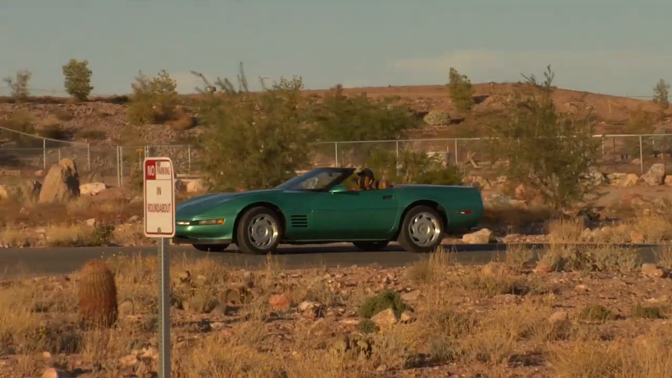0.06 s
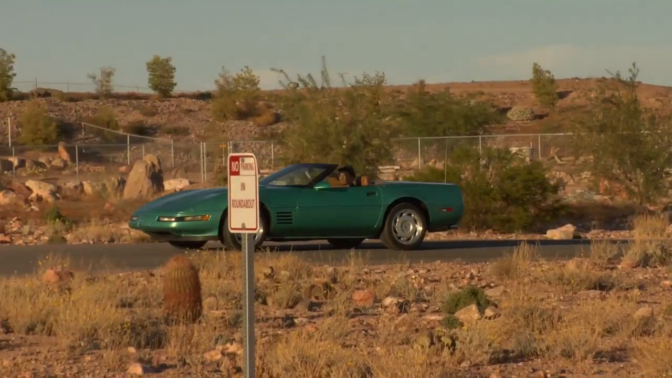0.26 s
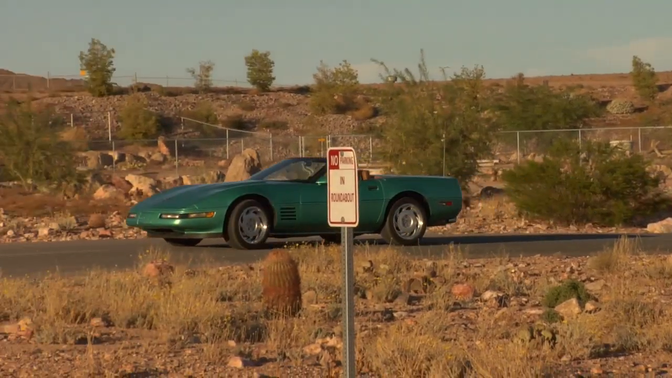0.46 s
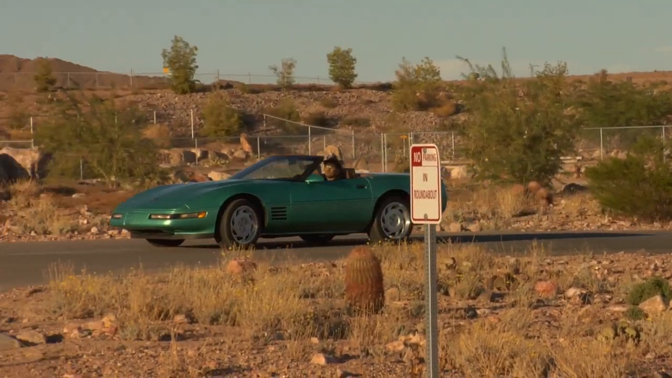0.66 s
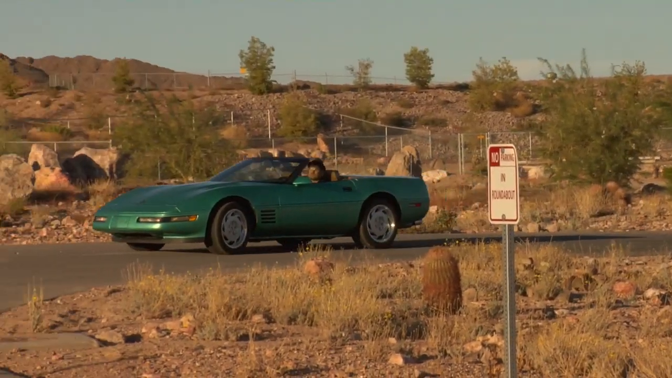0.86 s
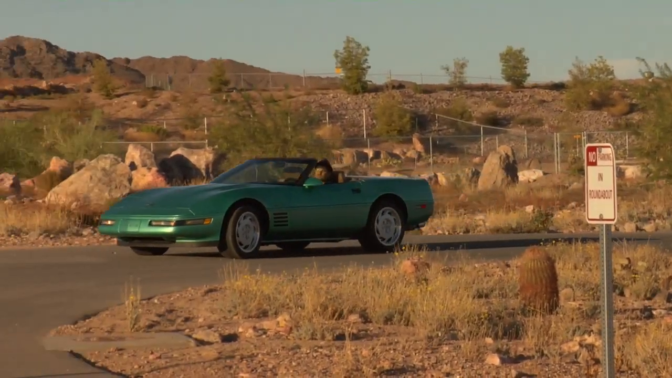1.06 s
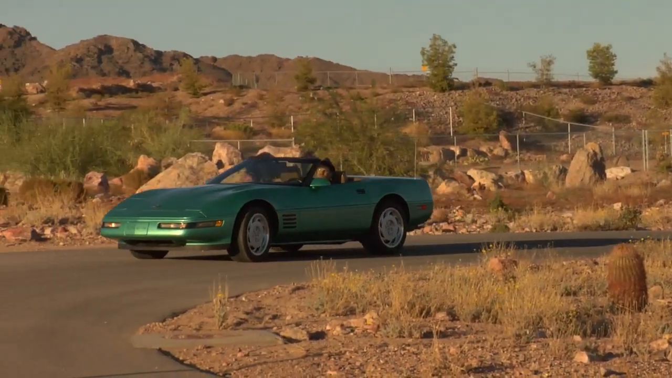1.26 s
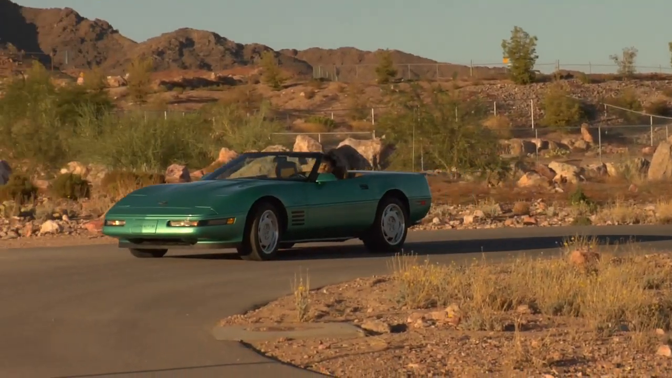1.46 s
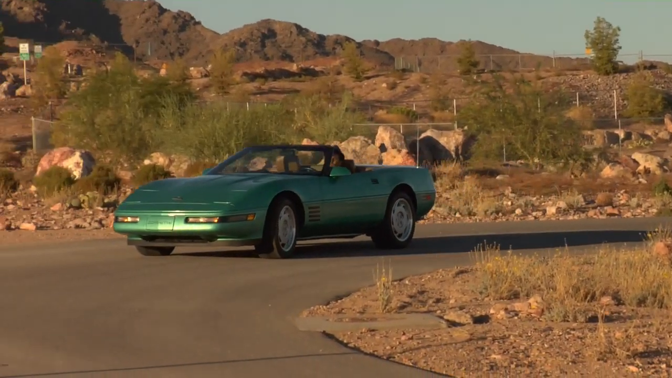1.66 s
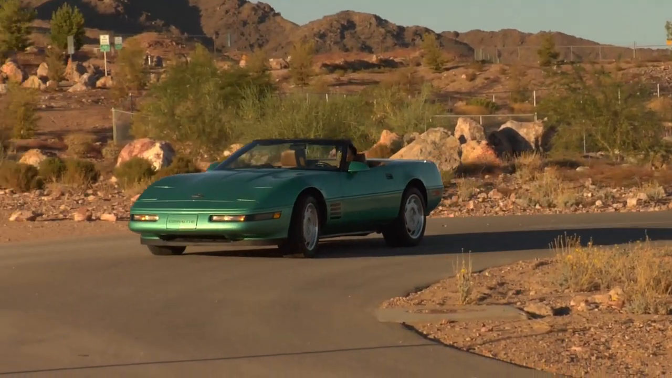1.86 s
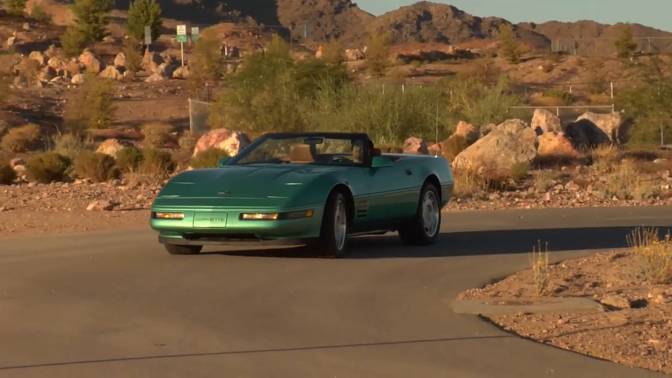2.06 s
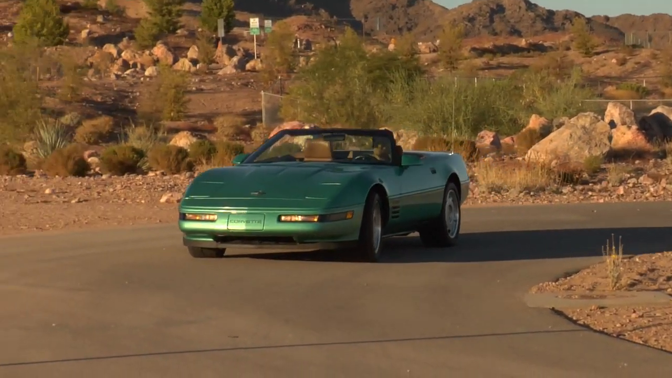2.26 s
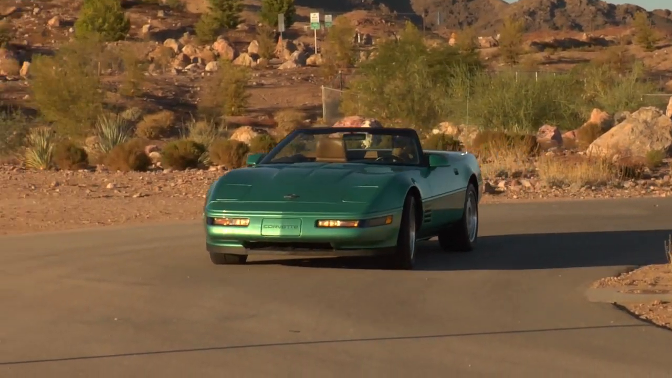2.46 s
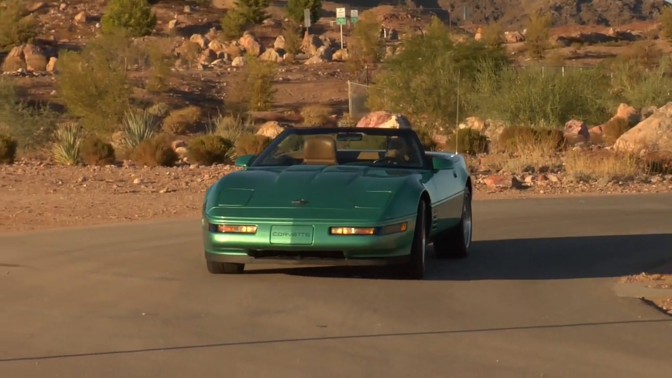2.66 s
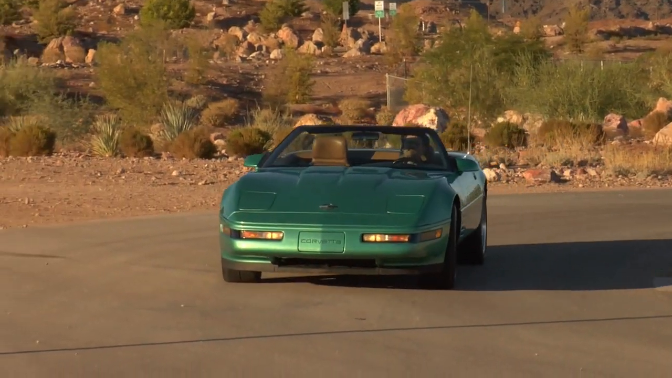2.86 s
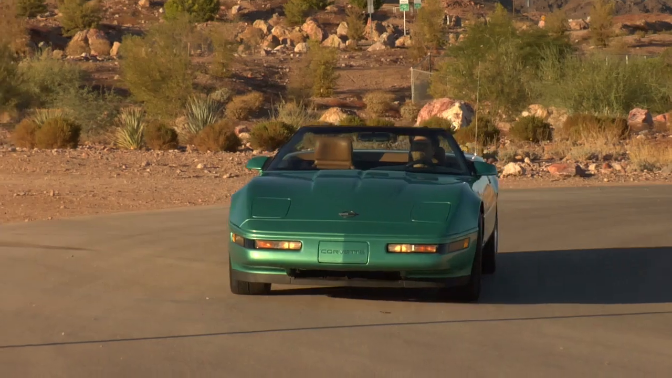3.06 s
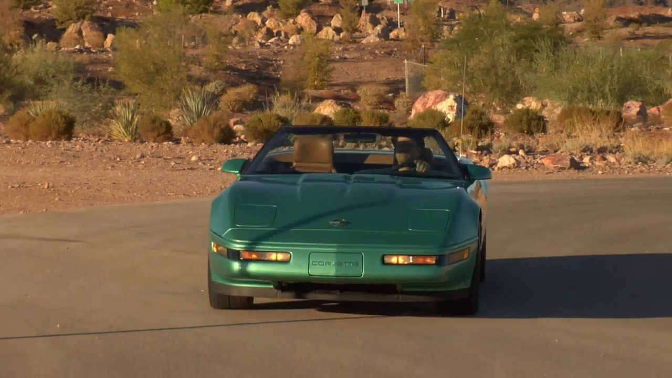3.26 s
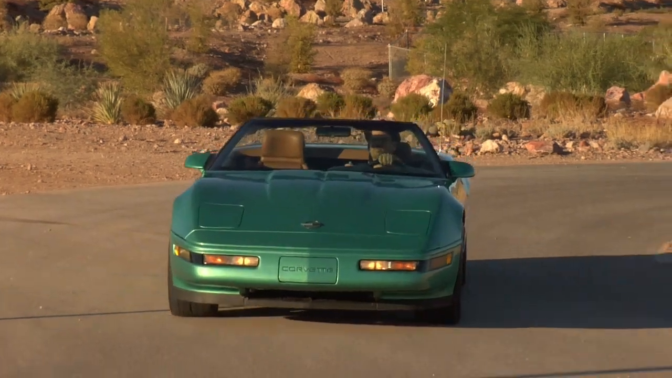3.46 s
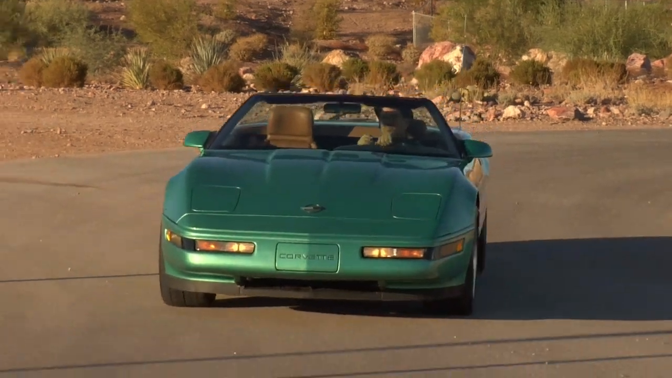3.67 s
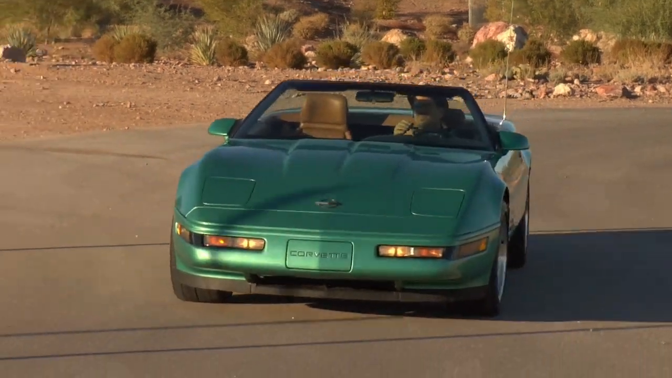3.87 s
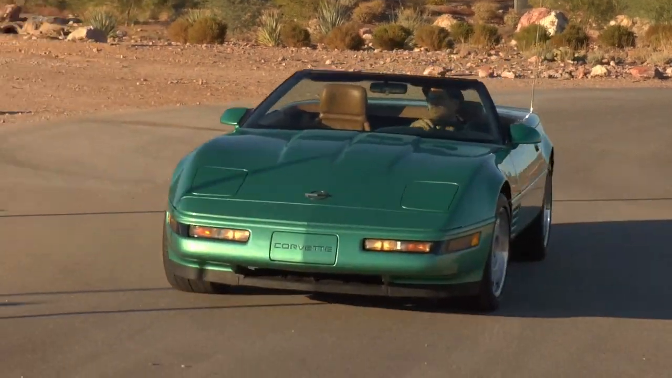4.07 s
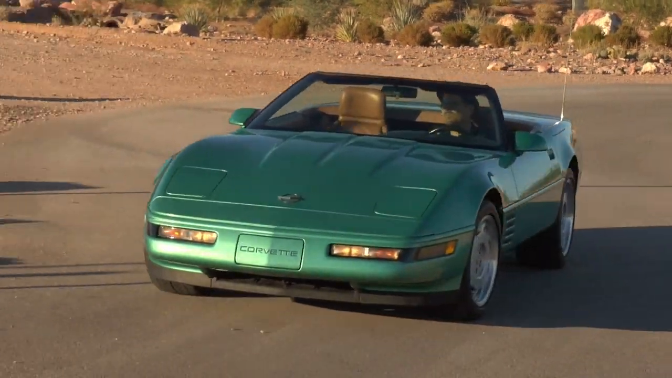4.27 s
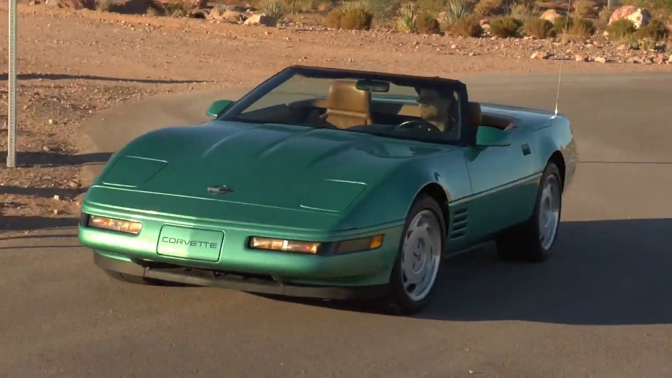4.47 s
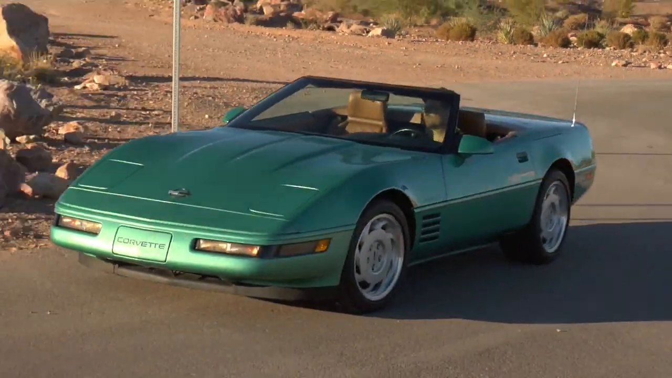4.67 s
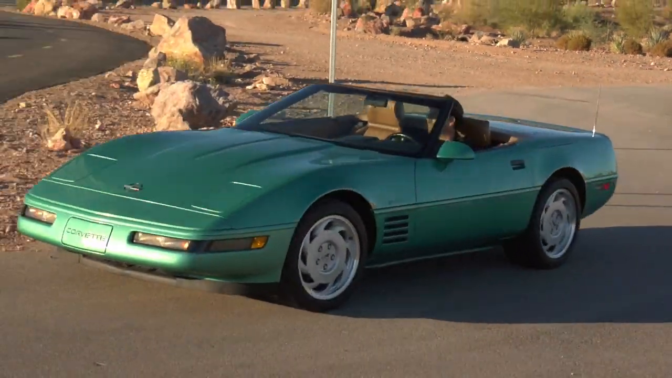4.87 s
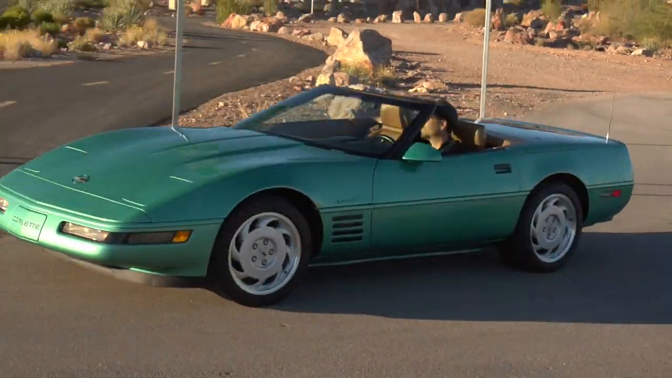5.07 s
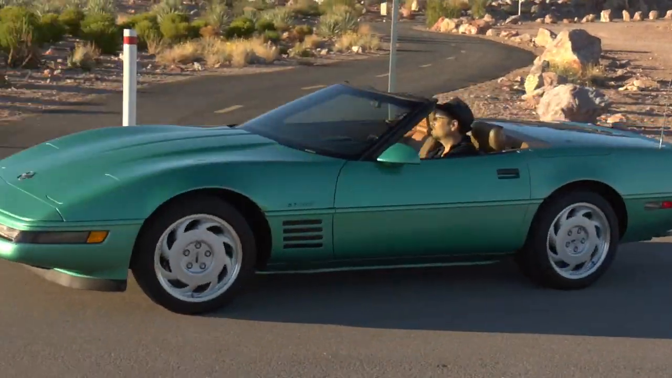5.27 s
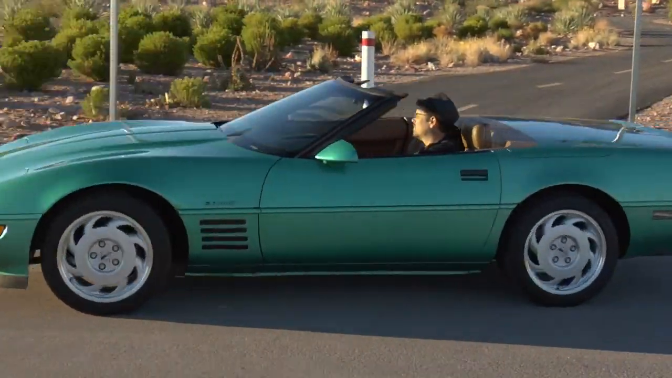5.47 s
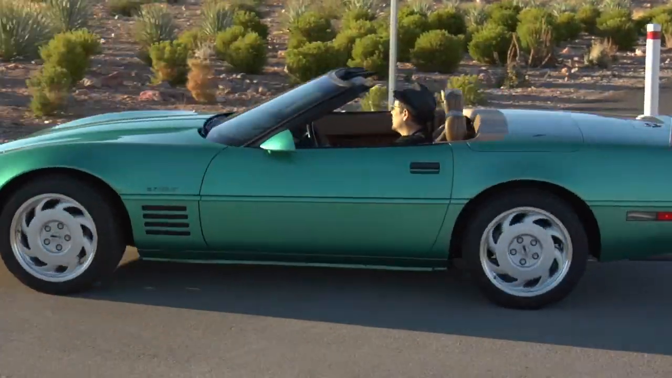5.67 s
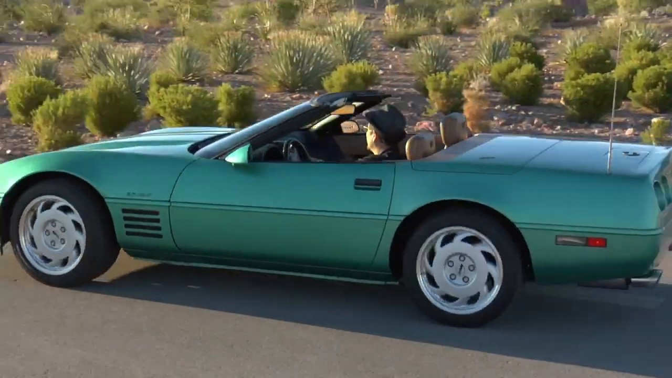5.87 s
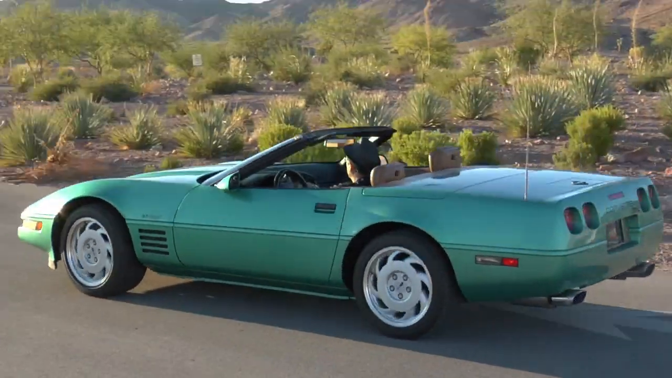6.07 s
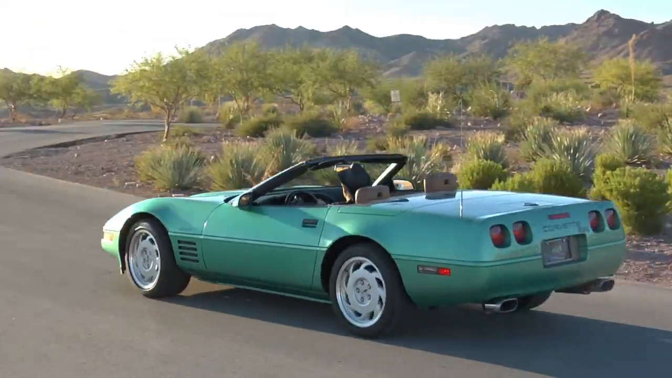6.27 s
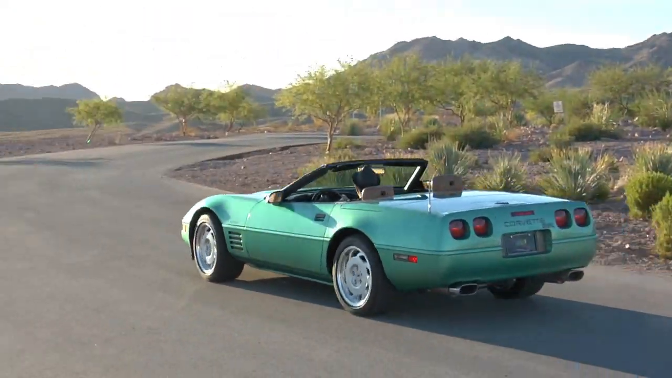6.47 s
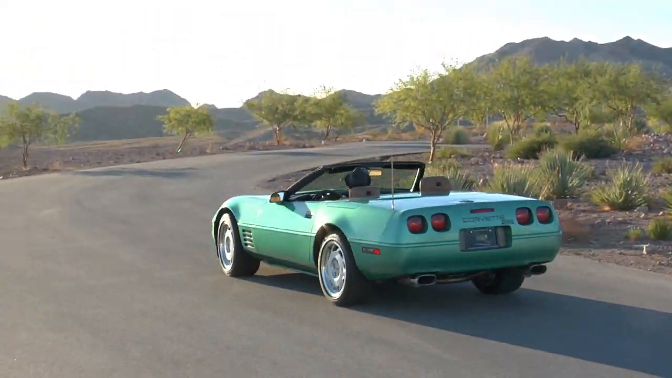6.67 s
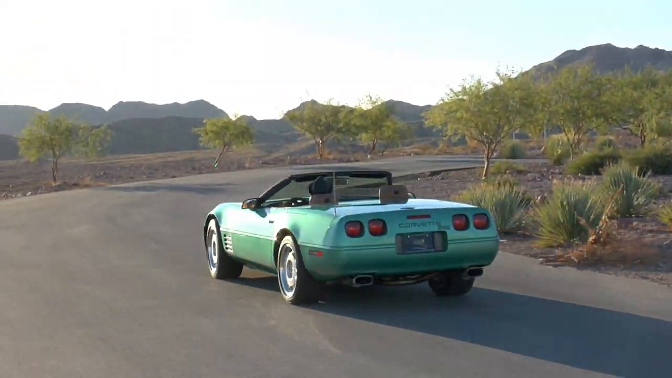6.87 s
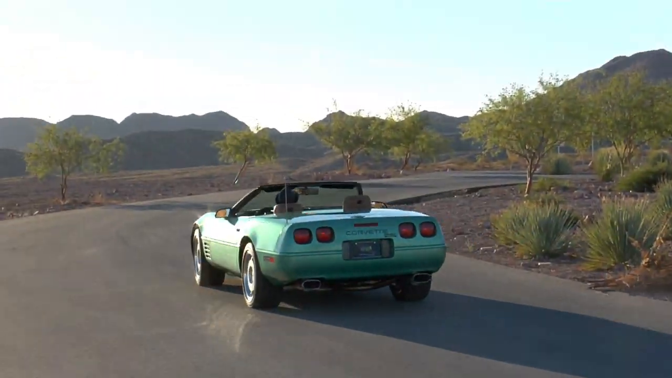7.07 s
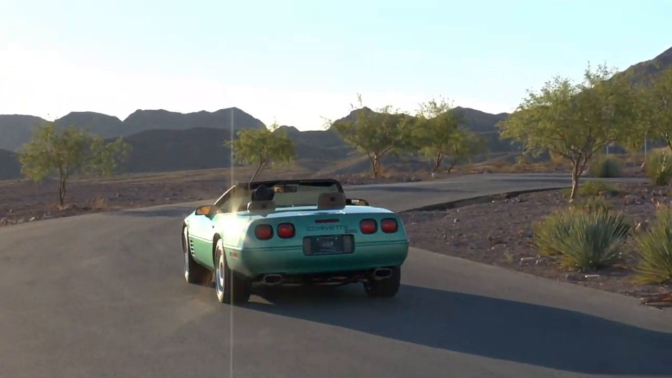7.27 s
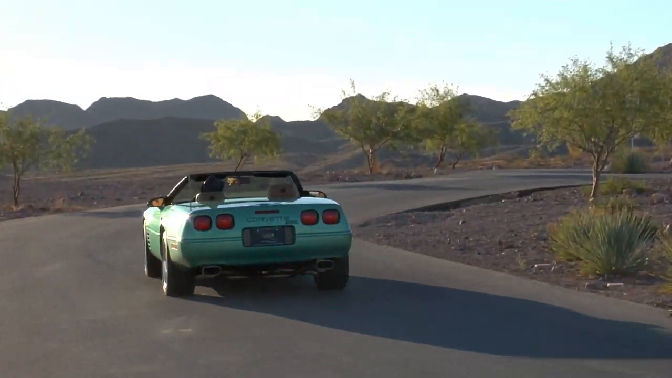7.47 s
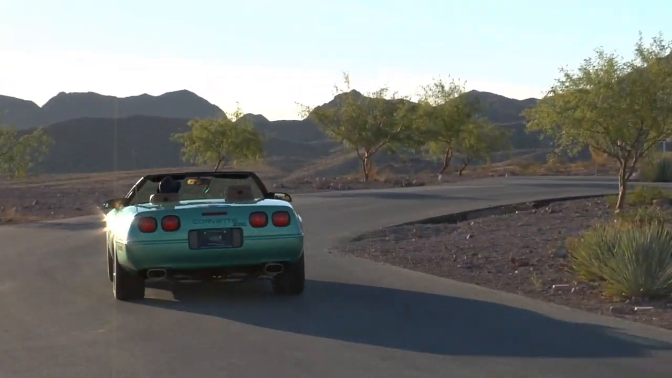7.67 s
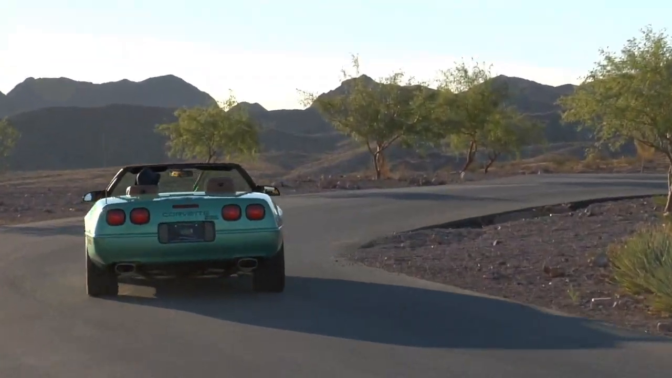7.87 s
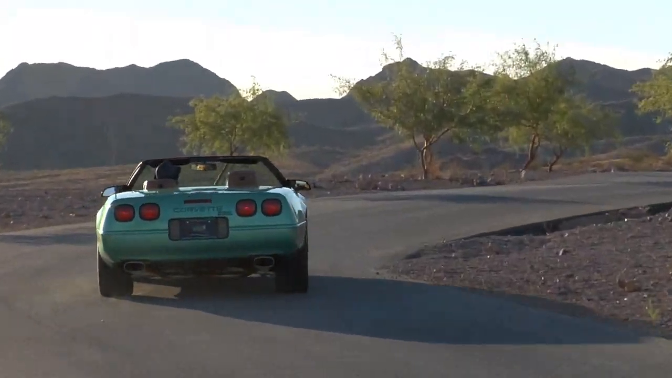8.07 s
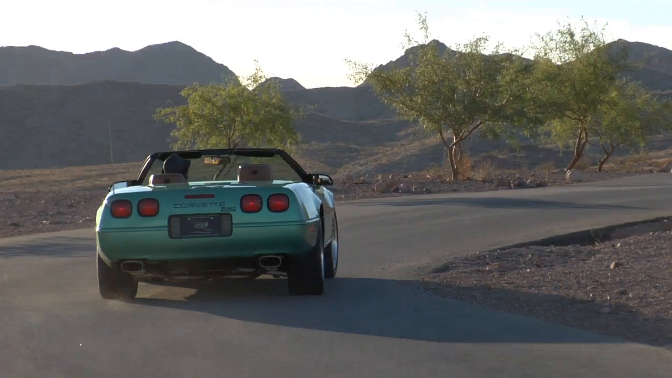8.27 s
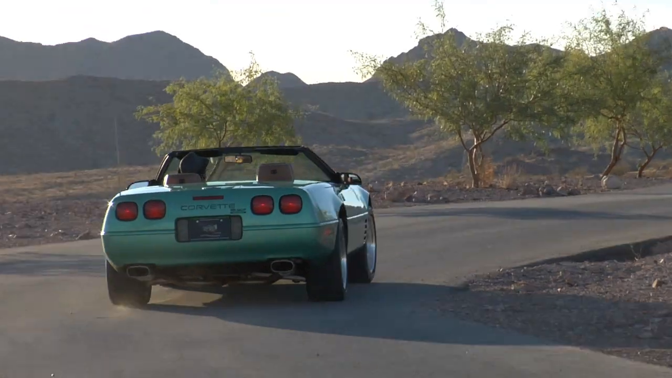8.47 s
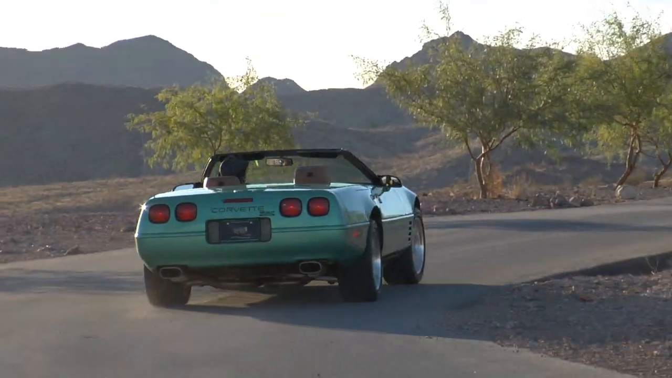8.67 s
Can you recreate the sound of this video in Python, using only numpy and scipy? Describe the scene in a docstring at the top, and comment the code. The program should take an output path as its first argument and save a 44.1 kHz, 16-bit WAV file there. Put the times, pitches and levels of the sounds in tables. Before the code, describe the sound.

A dry outdoor roadside, heard in mono from a fixed spot, with faint air hiss and a wavering low rumble that swells near 0.5 and 3.6 seconds. From the start a V8 car rolls up near idle, a muted, limping low burble partly screened until about 2 seconds. Tyre roar and gritty hiss grow clearer, with a wavering belt whine strongest around 3.5 seconds. Single stones snap between 3.6 and 5.2. From about 4.9 the throttle opens and the pitch rises quickly, nearly doubling by 5.5. The car passes closest at about 5.9, grit loud and broad; loose metal chinks cluster from 5.9 to 6.5. Afterwards the tailpipes face the listener: deep boom, throbbing drone and throaty rasp, strongest around 6.7. The tyres recede, one stone ticks at 7.2, the revs ease, a soft thud falls near 8.2, and the exhaust still drones at the end, around 8.7.

```python
"""Sports car driving past

A V8 sports car rolls up an open desert road near idle, opens the throttle as it passes, and drives off.
Steady tones make the tailpipe boom; noise pulsed by uneven firings rings as muffler burble and gas rasp.
Filtered noise and random grains make the gritty tyre sound, with single stones snapping.
A loose metal part chinks as ringing noise bursts, a belt whine comes from ahead, and a rumble lies beneath."""
import sys
import numpy as np
from scipy import signal
from scipy.fft import rfft, irfft, next_fast_len
from scipy.io import wavfile
from scipy.ndimage import uniform_filter1d, map_coordinates

SR = 44100
rng = np.random.default_rng(int(sys.argv[2]) if len(sys.argv) > 2 else 0)


def transcribe(u):
    """Save the signal u as a 16-bit wav file named by the first command-line argument.

    u: samples, shape (n,) or (channels, n), limited to [-1, 1]; the rate is SR.
    q: integer samples, one column per channel.
    """
    v = np.clip(np.atleast_2d(u).T, -1, 1)
    q = np.round(v * 32767).astype(np.int16)
    wavfile.write(sys.argv[1], SR, q)


N = 384111
TIME = np.arange(N) / SR
TOP_HZ = 15700

# spectrum of the low outdoor rumble: (frequency [Hz], relative level [dB])
RUMBLE = [(15, -20), (28, -11.5), (40, -1.5), (58, 3.5), (78, 9.5), (100, 13.5), (140, 3), (220, -13),
          (500, -45), (3000, -75)]
# times when the rumble swells: (middle [s], half-length [s], rise [dB])
RUMBLE_SWELLS = [(0.5, 0.64, 5.5), (3.604, 0.84, 7)]
# spectrum of the faint even hiss: (frequency [Hz], relative level [dB])
AIR = [(30, 21), (300, 10.5), (1000, 7), (3000, -1), (6000, 1.5), (10000, 1.5), (15500, 1)]

# spectrum of the tread roar: (frequency [Hz], relative level [dB])
TYRES = [(200, 1), (450, 1), (700, -1), (820, 2), (970, 5), (1100, 1.5), (1250, -3.5), (1800, -7),
         (2300, -18.5), (3000, -32), (4500, -45), (8000, -76.5)]
# spectrum of the crushed grit: (frequency [Hz], relative level [dB])
HISS = [(800, -14.5), (1600, 2.5), (2200, 3.5), (2800, -4), (3400, -10), (4300, -16.5), (5000, -17.5),
        (6500, -23), (8000, -29.5), (11000, -43), (15000, -46.5)]
# stones snapping under the tread: (time [s], peak level [dB], centre [Hz])
STONES = [(3.5835, -54, 3590), (3.625, -56, 3295), (4.248, -52, 2997), (4.536, -51, 2700),
          (4.677, -59, 4690), (4.843, -53, 3200), (5.22, -55, 4210), (7.211, -54, 3400)]
# jolts of a loose metal part: (time [s], level before a shared trim [dB])
CHINKS = [(5.9, -58), (6.042, -59), (6.074, -58), (6.191, -62), (6.275, -57), (6.288, -48.5), (6.312, -50),
          (6.361, -56), (6.393, -51.5), (6.418, -57), (6.474, -56), (6.553, -64), (6.705, -65),
          (6.837, -72.5), (6.941, -64.5), (7.185, -60)]
# resonances of that part: (frequency [Hz], width [Hz], relative level [dB])
CHINK_MODES = [(990, 190, 14.5), (2750, 500, 0.5), (4500, 780, -11), (4988, 160, -6.5), (5220, 95, -12)]

# engine speed, from idle to a light pull and easing off again: (time [s], firing rate [Hz])
REVS = [(0.0, 55.62), (0.7, 57.88), (1.45, 52.49), (2.32, 53.2), (2.71, 54.39), (3.13, 53.48),
        (4.48, 52.64), (4.82, 54.99), (4.99, 62.2), (5.23, 83.66), (5.45, 101), (5.72, 102.9),
        (6.18, 101.1), (6.52, 105.2), (7.22, 98.1), (7.51, 99.24), (8.33, 83.6), (8.7, 86.6)]
# how squarely the tailpipes face the listener: (time [s], share [0-1])
FACING = [(0, 0), (2.6, 0), (3.3, 0.08), (5.2, 0.03), (5.7, 0.36), (6.15, 0.6), (6.65, 1), (8.71, 1)]
# pulse strength of each cylinder in firing order: (strength [dB])
CYLINDERS = [-2, 0, 1, 5, 1, -2.5, 0, 4.5]
# muffler resonances: (frequency [Hz], width [Hz], ahead of the car [dB], beside it [dB], behind it [dB])
MUFFLER = [(149.4, 46, -6.5, -14, -17.5), (202.7, 58.5, -1, -3.5, -2.5), (248.4, 41.7, 3, -0.5, -6),
           (296.7, 46.5, -4.5, -0.5, -5.5)]
# spectrum of the gas rasp: (frequency [Hz], relative level [dB])
RASP = [(250, -32.5), (350, -8.5), (420, -2), (485, 0), (540, -3.5), (600, -0.5), (690, -12.5),
        (900, -13.5), (1400, -34), (3000, -63.5)]
# pipe-mouth resonances beamed to the rear: (frequency [Hz], width [Hz], relative level [dB])
BARK = [(518, 150, -6.5), (730, 550, -19.5)]
# brief surges of gas under throttle: (middle [s], half-length [s], burble change [dB], rasp change [dB])
SURGES = [(2.297, 0.72, 1.5, 0), (5.824, 0.076, 3, -2), (6.3, 0.092, 0.5, 0.5), (6.72, 0.36, 1, 8.5),
          (7.661, 0.2, 4.5, 4.5)]
# dip of the octave and burble once per engine cycle, before scaling by FACING:
# (firing rate [Hz], depth [0-1])
THROB = [(86, 0.25), (97, 0.85)]
# how the tailpipes pass each tone, booming near 100 Hz: (frequency [Hz], gain [dB])
PIPE = [(54, -8), (70, -4), (85, -3), (102, 0), (126, 1.5), (141, -8), (170, -16.5), (200, -30)]
# tones of the uneven firings, 8 being the firing tone:
# (multiple of the engine cycle rate, ahead of the car [dB], beside it [dB], behind it [dB])
LOPE = [(3, -38, -30, -32), (4, -27.5, -22, -32), (5, -15, 5, -10.5), (6, -18, -9, -18.5), (7, -8, -4, -21),
        (9, -19, -7, -13), (10, 2.5, 1, -1.5), (11, -10, -14.5, -11.5), (12, -13.5, -22.5, -16),
        (13, -20.5, -23, -16), (14, -14.5, -25, -7), (18, -16.5, -14, -19)]

# the drive past: speed, least distance, when the wheels are nearest, how far the tailpipes trail them
SPEED_M_S, KERB_M, PASS_S, TAIL_M = 5.7, 4.16, 5.945, 0.68
# a stony verge screens the car until it has rounded the bend
VERGE_S, CLEAR_S = 0.92, 2.03
# out of the bend it heads straight at the listener: (middle [s], half-length [s])
HEAD_ON = (3.57, 0.93)
# its body then hides the tailpipes until it draws level: (middle [s], half-length [s])
PIPES_HIDDEN = (4, 1.56)
# exhaust tones at the least distance: level at idle, and their growth with the revs
IDLE_HZ, IDLE_DB, EFFORT_DB_PER_OCTAVE = 55.3, -30, 15.5
# beaming of the octave and the lope: (ahead of the car [dB], beside it [dB], behind it [dB])
OCTAVE_BEAM_DB = (-2, -2, 15.5)
LOPE_BEAM_DB = (-9.5, -24, -7)
# sharpness of the once-per-cycle dip (share 0-1)
THROB_EDGE = 0.27


def undb(db):
    """Turn decibels into a gain."""
    return 10 ** (np.asarray(db) / 20)


def unit(x):
    """Scale to an average strength (rms) of 1."""
    return x / np.sqrt(np.mean(x ** 2))


def steady(x):
    """Scale to rms 1 over every half second, keeping the quick flutter."""
    return x / np.sqrt(uniform_filter1d(x ** 2, SR // 2) + 1e-18)


def curves(table):
    """Turn the columns of a table into smooth controls, one value a sample."""
    s, *columns = np.transpose(table)
    return [uniform_filter1d(np.interp(TIME, s, c), SR // 20, mode="nearest") for c in columns]


def noise():
    """White noise: equal strength at all frequencies."""
    return rng.standard_normal(N)


def colour(x, points):
    """Shape a sound by a spectrum of (frequency [Hz], level [dB]) points, then scale it to rms 1."""
    hz, db = np.transpose(points)
    size = next_fast_len(N + SR // 4)
    bin_hz = np.arange(size // 2 + 1) * SR / size
    gain = undb(np.interp(np.log(bin_hz + 1), np.log(hz), db))
    return unit(irfft(rfft(x, size) * gain, size)[:N])


def resonate(x, hz, width_hz):
    """Ring at one frequency: a resonance applied twice, for steep sides."""
    b, a = signal.iirpeak(hz, hz / width_hz, fs=SR)
    return signal.lfilter(b, a, signal.lfilter(b, a, x))


def walk(rate):
    """Slow random drift with a spread near 1, taking rate new values a second."""
    steps = rng.standard_normal(N // 100)
    return map_coordinates(steps, [TIME * rate], order=1, mode="wrap") * np.sqrt(3 / 2)


def bell(middle_s, half_s):
    """A smooth rise to 1 and fall again."""
    return np.exp(-((TIME - middle_s) / half_s) ** 2)


def add(track, s, sound):
    """Mix a short sound in at time s."""
    start = int(s * SR)
    track[start:start + len(sound)] += sound[:N - start]


def air(level_db=-73):
    """Still air: a faint even hiss of shaped noise."""
    return undb(level_db) * colour(noise(), AIR)


def rumble(level_db=-52.0, waver_db=3.3):
    """A low, wavering outdoor rumble that swells now and then."""
    swell_db = sum(db * bell(s, half_s) for s, half_s, db in RUMBLE_SWELLS)
    return colour(noise(), RUMBLE) * undb(level_db + swell_db + waver_db * walk(2))


def nearness(behind_m=0):
    """Least distance over present distance, for a point on the car: its gain as sound spreads out."""
    along_m = SPEED_M_S * (TIME - PASS_S) - behind_m
    return KERB_M / np.hypot(along_m, KERB_M)


def screened():
    """1 while the car is behind the verge, falling to 0 once it is in the open."""
    return np.clip((CLEAR_S - TIME) / (CLEAR_S - VERGE_S), 0, 1)


def aspect_db(facing, ahead_db, beside_db, behind_db):
    """Blend three levels as the car is heard from the front, the side and the rear."""
    return np.interp(facing, [0, .5, 1], [ahead_db, beside_db, behind_db])


def tread_roar(facing, level_db=-39.5, horn_db=5, rear_db=0.46, verge_db=-13, flicker_db=1.0):
    """Tread noise, beamed along the road by the wedge between tyre and asphalt."""
    end_on = (1 - nearness() ** 2) ** 2
    roar_db = level_db + horn_db * end_on + rear_db * facing + verge_db * screened()
    return colour(noise(), TYRES) * undb(roar_db + flicker_db * walk(14))


def grit_hiss(facing, level_db=-50.0, head_on_db=-6.5, rear_db=-3, verge_db=-2.0, flicker_db=1.0,
              grain_db=4.5, grit=0.52, grains_per_s=1500):
    """Crushed grit thrown out sideways: noise mixed with random grains of many sizes."""
    struck = rng.random(N) < grains_per_s / SR
    grain_size = undb(grain_db * np.minimum(rng.exponential(size=N), 6))
    grains = struck * np.sign(noise()) * grain_size
    hiss_db = level_db + head_on_db * bell(*HEAD_ON) + rear_db * facing + verge_db * screened()
    return colour(noise() + grit * unit(grains), HISS) * undb(hiss_db + flicker_db * walk(20))


def tyres(facing):
    """Tread roar and grit hiss, both growing as the wheels come near."""
    return nearness() * (tread_roar(facing) + grit_hiss(facing))


def stones(decay_s=.002, width_hz=2200):
    """Single stones crack out from under the tyres: short noise bursts ring at their own pitch."""
    out = np.zeros(N)
    t = TIME[:SR // 20]
    for s, db, hz in STONES:
        burst = rng.standard_normal(len(t)) * np.exp(-t / decay_s)
        snap = resonate(burst, hz, width_hz)
        add(out, s, undb(db) * snap / np.abs(snap).max())
    return out


def chinks(decay_s=0.019, trim_db=-10):
    """A loose metal part chatters briefly at each jolt and rings at its own frequencies."""
    out = np.zeros(N)
    t = TIME[:SR // 10]
    for s, db in CHINKS:
        chatter = rng.standard_normal(len(t)) * np.exp(-t / decay_s)
        ring = 0
        for hz, width_hz, mode_db in CHINK_MODES:
            ring = ring + undb(mode_db) * unit(resonate(chatter, hz, width_hz))
        add(out, s, undb(db + trim_db) * ring)
    return out


def thump(s=8.235, hz=140, width_hz=55, length_s=0.11, db=-39):
    """A soft low thud as the revs bottom out: a swell of noise rings at a low frequency."""
    out = np.zeros(N)
    swell = np.hanning(int(length_s * SR))
    puff = swell * rng.standard_normal(len(swell))
    puff = np.pad(puff, (0, SR // 20))  # room to ring on
    add(out, s, undb(db) * unit(resonate(puff, hz, width_hz)))
    return out


def whine(cycle, facing, level_db=-45.0, head_on_db=5.0, rear_db=-45, verge_db=-10,
          per_cycle=70.8, octave_db=-1, flutter_db=3, wander=.25):
    """Belt-driven parts: a wavering tone and its octave, geared to the engine and beamed forward."""
    angle = 2 * np.pi * (per_cycle * cycle + wander * walk(25))
    tone = undb(flutter_db * walk(8.1)) * np.sin(angle)
    octave = undb(octave_db + flutter_db * walk(14)) * np.sin(2 * angle)
    whine_db = level_db + head_on_db * bell(*HEAD_ON) + rear_db * facing + verge_db * screened()
    return nearness() * undb(whine_db) * (tone + octave)


def throb_depth(firing_hz, facing):
    """The throb is heard from behind, and smooths into a drone as the revs sink."""
    return facing * np.interp(firing_hz, *np.transpose(THROB))


def throb(cycle, depth):
    """Gain of the exhaust note: it holds, then dips briefly in the middle of each engine cycle."""
    angle = 2 * np.pi * cycle
    return 1 + depth * (np.cos(angle) - THROB_EDGE * np.cos(2 * angle))


def firings(cycle, scatter_db=2, jitter_s=0.00024):
    """One pulse per cylinder firing, each a little off in strength and time."""
    count = np.floor(cycle * len(CYLINDERS)).astype(int)
    at = np.flatnonzero(np.diff(count))
    chance = rng.standard_normal((len(at), 2))
    cylinder_db = np.array(CYLINDERS)[count[at] % len(CYLINDERS)]
    shift = (jitter_s * SR * chance[:, 1]).astype(int)
    pulses = np.zeros(N)
    pulses[np.clip(at + shift, 0, N - 1)] = undb(cylinder_db + scatter_db * chance[:, 0])
    return pulses


def turbulence(cycle, facing, size=4096):
    """Gas flow that partly repeats with every engine cycle, most of all straight out of the pipes."""
    repeat = .5 + .35 * facing
    pattern = rng.standard_normal(size)
    repeated = pattern[(cycle * size).astype(int) % size]
    return np.sqrt(repeat) * repeated + np.sqrt(1 - repeat) * noise()


def gas_levels(facing, burble_db=-26, burble_hidden_db=-7.0, burble_rear_db=-5.5, burble_verge_db=-2.0,
               rasp_db=-36.0, rasp_hidden_db=-3.0, rasp_rear_db=-4.5):
    """Levels (dB) of burble and rasp: even, but for the car's position and the surges of gas."""
    hidden = bell(*PIPES_HIDDEN)
    burble = burble_db + burble_hidden_db * hidden + burble_rear_db * facing + burble_verge_db * screened()
    rasp = rasp_db + rasp_hidden_db * hidden + rasp_rear_db * facing
    for s, half_s, more_burble_db, more_rasp_db in SURGES:
        surge = bell(s, half_s)
        burble = burble + more_burble_db * surge
        rasp = rasp + more_rasp_db * surge
    return burble, rasp


def muffler_burble(drive, facing):
    """The mufflers ring at their resonances, with polarity alternating from one to the next."""
    burble = 0
    for k, (hz, width_hz, *levels) in enumerate(MUFFLER):
        burble = burble + (-1) ** k * undb(aspect_db(facing, *levels)) * resonate(drive, hz, width_hz)
    return burble


def pipe_rasp(mouth, facing):
    """Gas rasps at the pipe mouths, which beam a throaty bark to the rear."""
    bark = sum(undb(db) * unit(resonate(mouth, hz, width_hz)) for hz, width_hz, db in BARK)
    return colour(mouth, RASP) + facing * bark


def exhaust(cycle, firing_hz, facing, puff_s=0.0069, flow=0.47, burble_pulse=0.19, burble_throb=0.29,
            lead_cycles=0.078, rasp_pulse=0.65, waver_db=1.5):
    """Pulses and the puffs of gas behind them ring the mufflers and rasp at the pipe ends."""
    burble_db, rasp_db = gas_levels(facing)
    pulses = unit(firings(cycle))
    puffs = unit(signal.lfilter([1], [1, -np.exp(-1 / (puff_s * SR))], pulses))
    # from the front the puffs blur into an even flow
    strength = facing * puffs + flow * (1 - facing ** 2)
    gas = unit(strength * turbulence(cycle, facing))
    dip = throb(cycle + lead_cycles, burble_throb * throb_depth(firing_hz, facing))
    burble = muffler_burble((gas + burble_pulse * pulses) * dip, facing)
    rasp = pipe_rasp(gas + rasp_pulse * facing * pulses, facing)
    # the burble wavers until the pipes face the listener
    waver = waver_db * (1 - facing) * walk(3)
    return steady(burble) * undb(burble_db + waver) + steady(rasp) * undb(rasp_db)


def tone_levels(firing_hz, facing, verge_db=-2, head_on_db=2.0, cancel_s=6.19, cancel_half_s=0.29,
                cancel_db=-9.0, third_db=-17, third_head_on_db=9):
    """Levels (dB) of the firing tone, octave, third harmonic and lope; all but the third follow the revs."""
    hz, db = np.transpose(PIPE)
    head_on = bell(*HEAD_ON)
    effort = IDLE_DB + EFFORT_DB_PER_OCTAVE * np.log2(firing_hz / IDLE_HZ)
    heard = effort + verge_db * screened() + head_on_db * head_on
    firing = heard + np.interp(firing_hz, hz, db)
    octave = heard + np.interp(2 * firing_hz, hz, db) + aspect_db(facing, *OCTAVE_BEAM_DB)
    lope = firing + aspect_db(facing, *LOPE_BEAM_DB)
    # the third harmonic only stands out from the front
    third = IDLE_DB + third_db + third_head_on_db * head_on
    # side-on, the firing tones of the two tailpipes partly cancel
    firing = firing + cancel_db * bell(cancel_s, cancel_half_s)
    return firing, octave, third, lope


def uneven_lope(angle, facing, waver_db):
    """The limping beat of two cylinder banks that fire unevenly: tones at multiples of the cycle rate."""
    lope = 0
    for multiple, *levels in LOPE:
        k = round(multiple)
        # every fourth multiple has the other polarity, so the beat limps in time as well as in strength
        polarity = 1 if k % 4 == 1 else -1
        gain = undb(aspect_db(facing, *levels) + waver_db * walk(11))
        lope = lope + polarity * gain * np.cos(k * angle)
    return lope


def boom(cycle, firing_hz, facing, waver_db=1.64):
    """The clean tailpipe tones: firing rate, octave and third harmonic, with the lope around them."""
    firing_db, octave_db, third_db, lope_db = tone_levels(firing_hz, facing)
    angle = 2 * np.pi * cycle
    firing = angle * len(CYLINDERS)
    tone = undb(firing_db) * np.cos(firing)
    octave = undb(octave_db) * np.sin(2 * firing) * throb(cycle, throb_depth(firing_hz, facing))
    third = undb(third_db + waver_db * walk(11)) * np.cos(3 * firing)
    lope = undb(lope_db) * uneven_lope(angle, facing, waver_db)
    return np.sqrt(2) * (tone + octave + third + lope)


def scene():
    """The car over a low rumble, still air and a faint even hiss."""
    background = rumble() + air()
    firing_hz = curves(REVS)[0]
    facing = np.clip(curves(FACING)[0], 0, 1)
    # engine cycles so far: all eight cylinders fire once in each, at a slightly unsteady pace
    cycle = np.cumsum(firing_hz * (1 + .003 * walk(10))) / SR / len(CYLINDERS)
    road = tyres(facing) + stones()
    tailpipes = nearness(TAIL_M) * (exhaust(cycle, firing_hz, facing) + boom(cycle, firing_hz, facing))
    car = chinks() + thump() + whine(cycle, facing) + tailpipes
    return (background + road + car)[None]


def record(dry):
    """A steep low-pass filter cuts the sound above TOP_HZ."""
    return signal.sosfilt(signal.ellip(10, .1, 80, TOP_HZ, fs=SR, output="sos"), dry)


dry = scene()
out = record(dry)
transcribe(out)
```